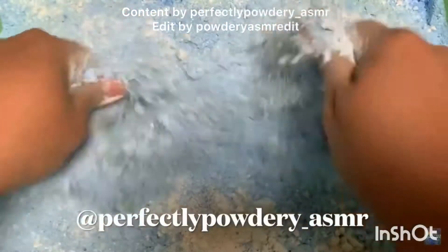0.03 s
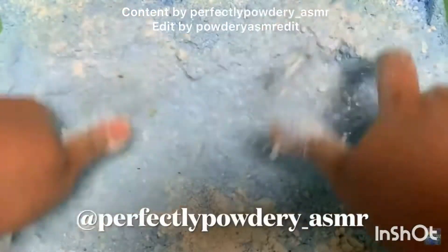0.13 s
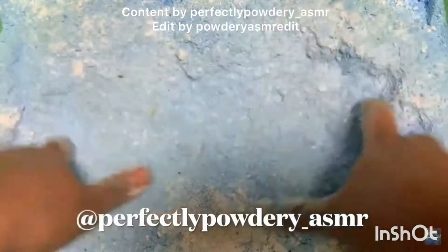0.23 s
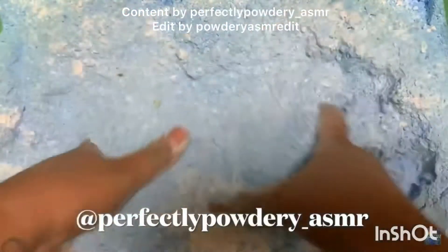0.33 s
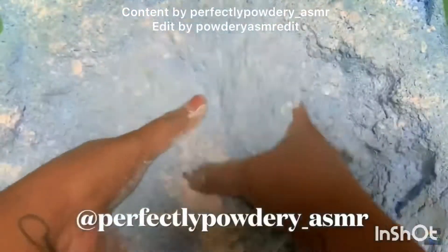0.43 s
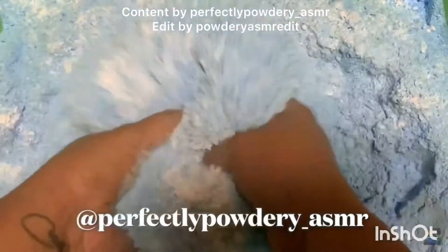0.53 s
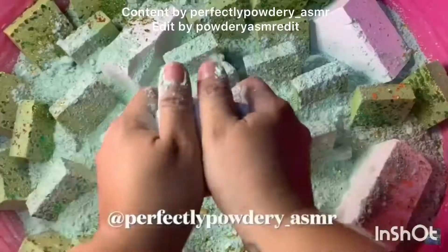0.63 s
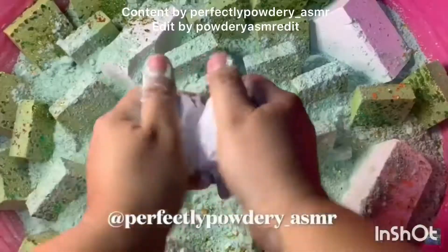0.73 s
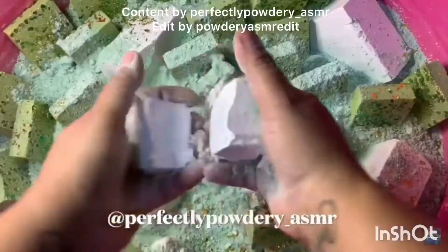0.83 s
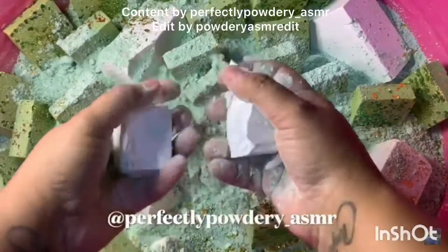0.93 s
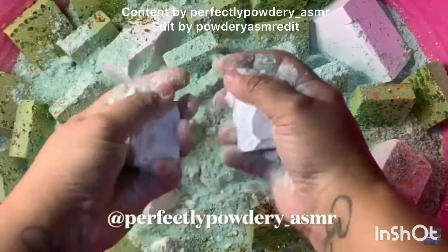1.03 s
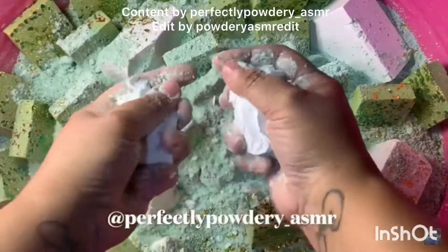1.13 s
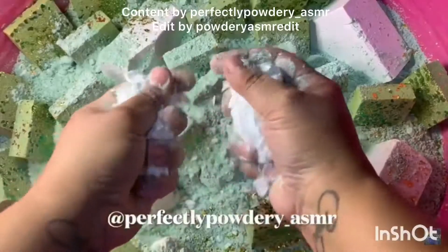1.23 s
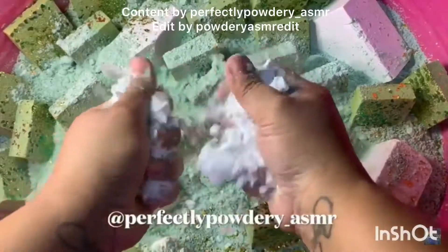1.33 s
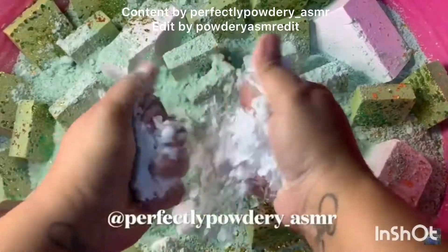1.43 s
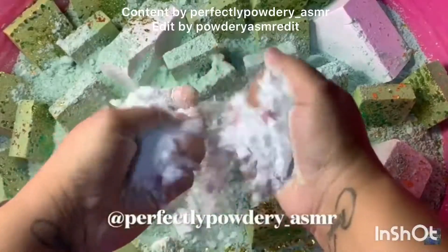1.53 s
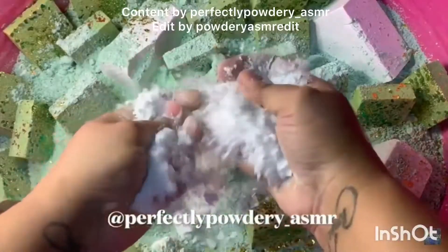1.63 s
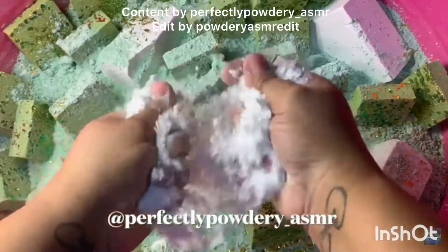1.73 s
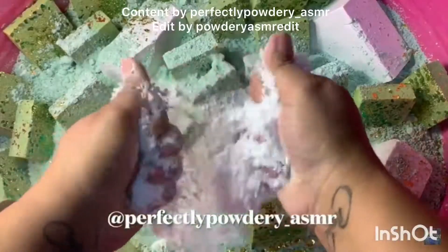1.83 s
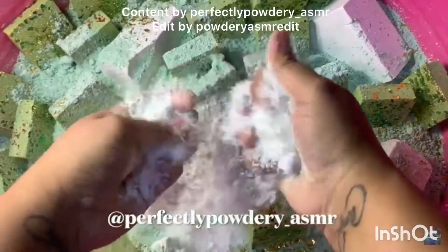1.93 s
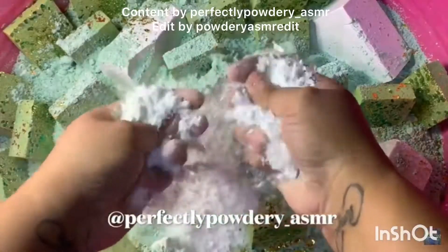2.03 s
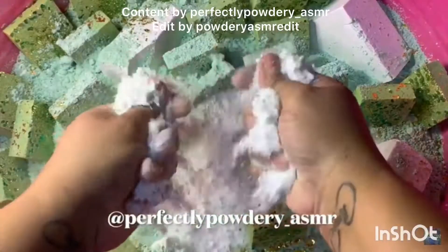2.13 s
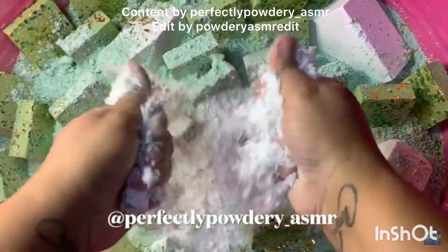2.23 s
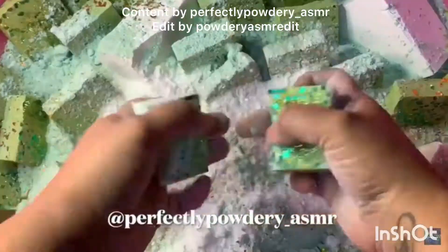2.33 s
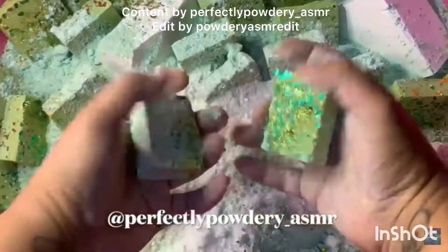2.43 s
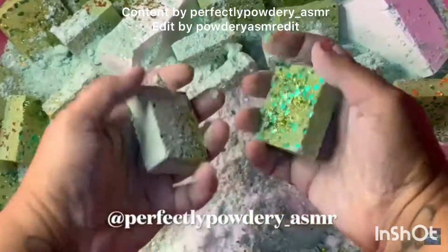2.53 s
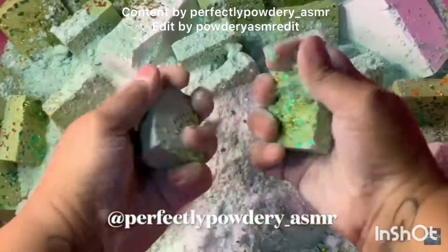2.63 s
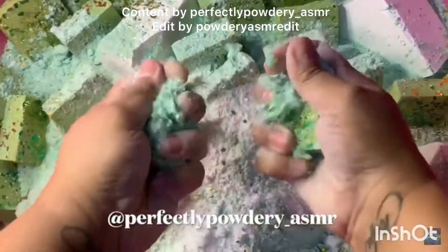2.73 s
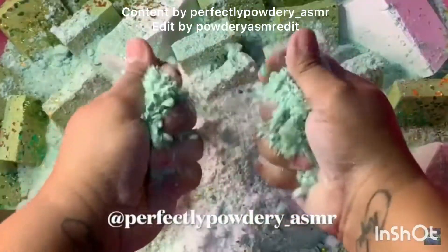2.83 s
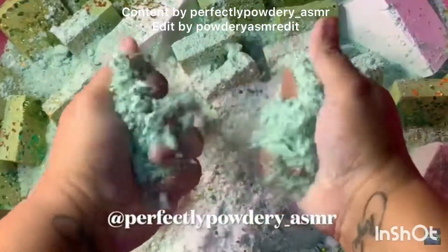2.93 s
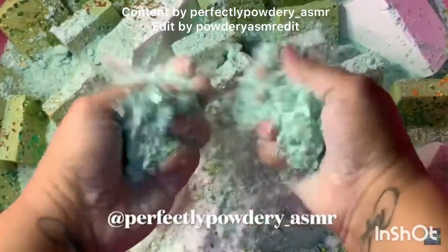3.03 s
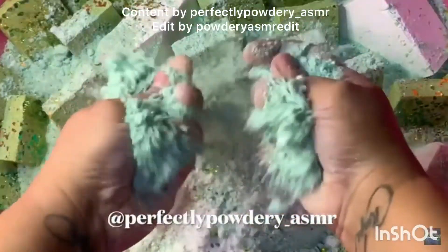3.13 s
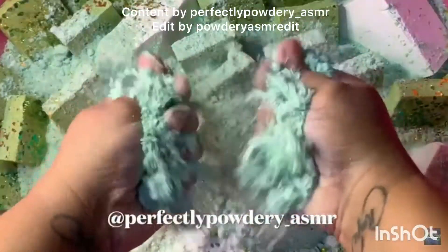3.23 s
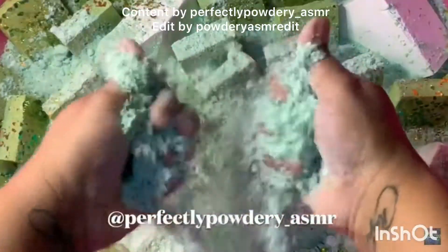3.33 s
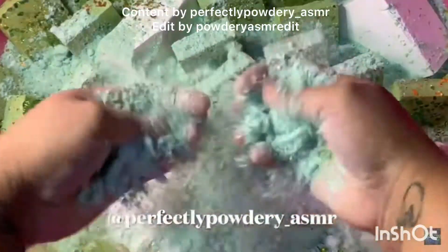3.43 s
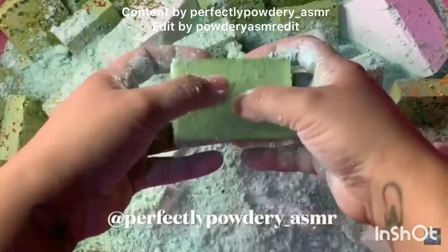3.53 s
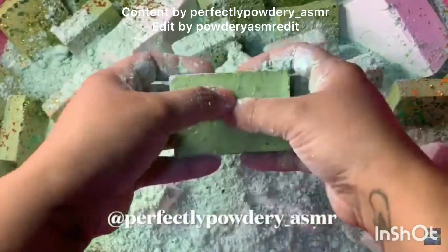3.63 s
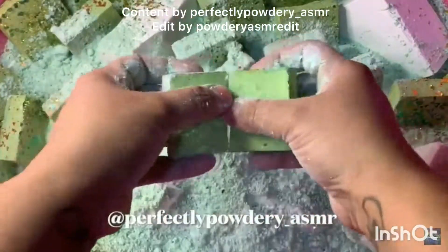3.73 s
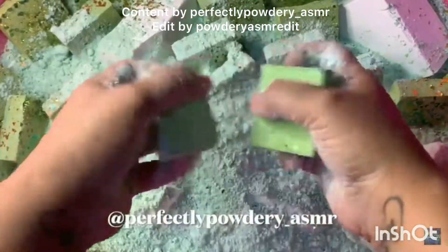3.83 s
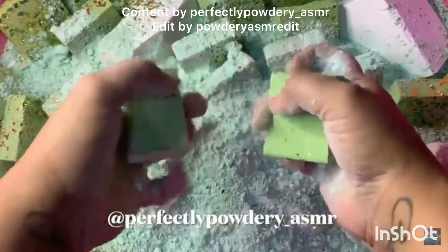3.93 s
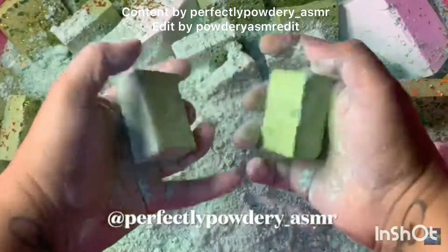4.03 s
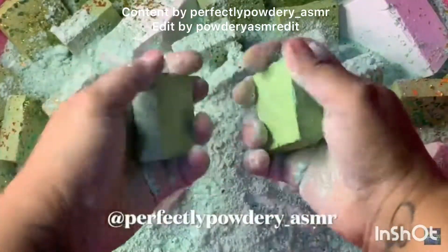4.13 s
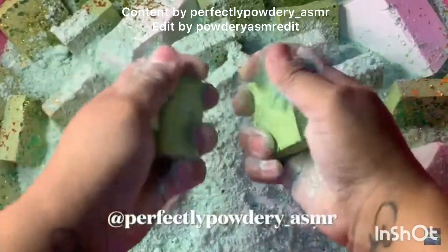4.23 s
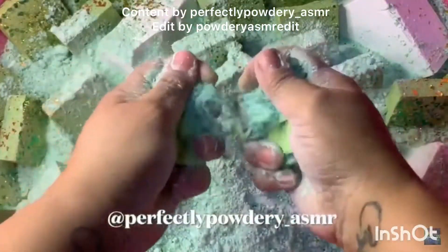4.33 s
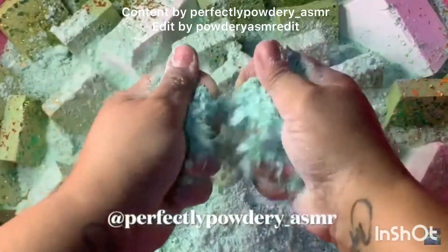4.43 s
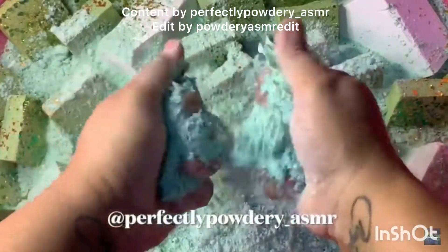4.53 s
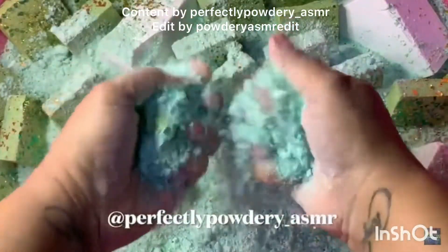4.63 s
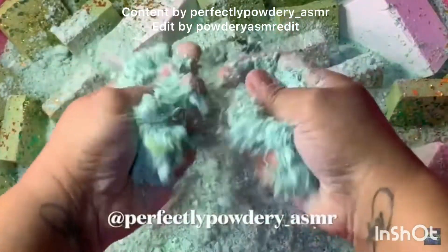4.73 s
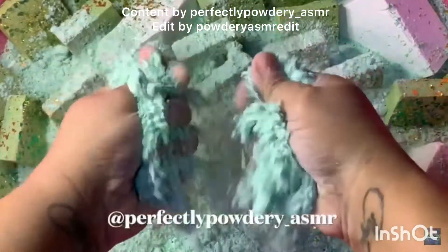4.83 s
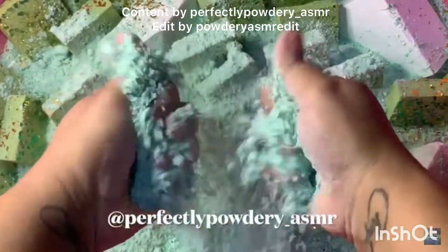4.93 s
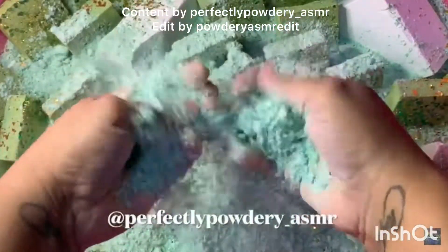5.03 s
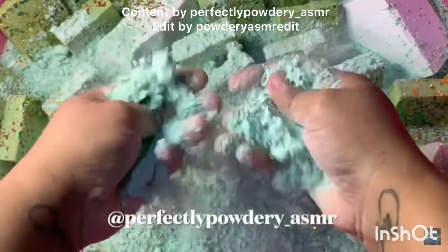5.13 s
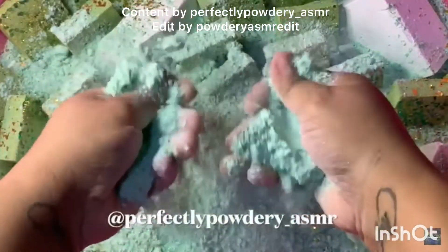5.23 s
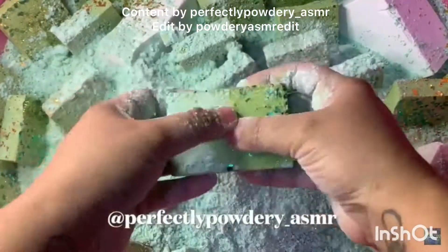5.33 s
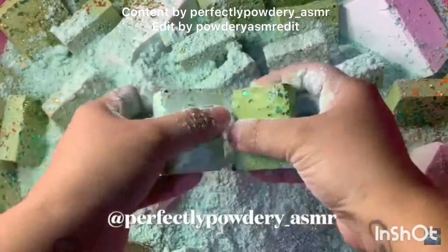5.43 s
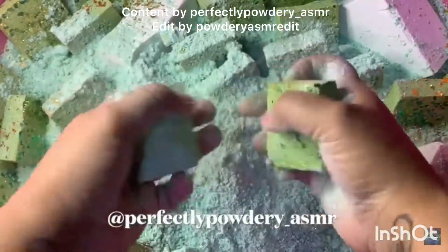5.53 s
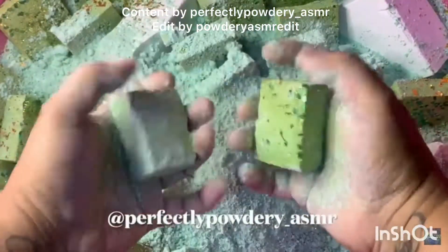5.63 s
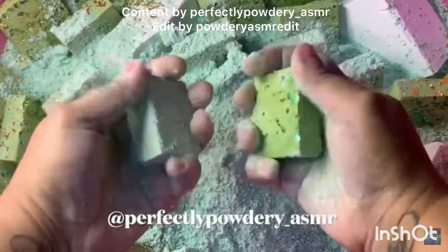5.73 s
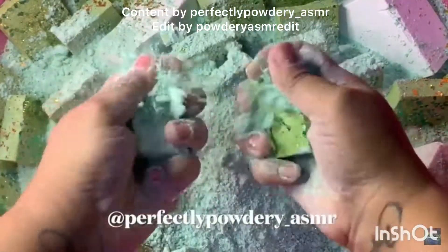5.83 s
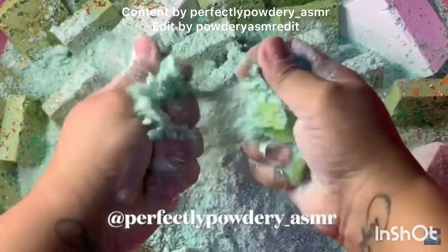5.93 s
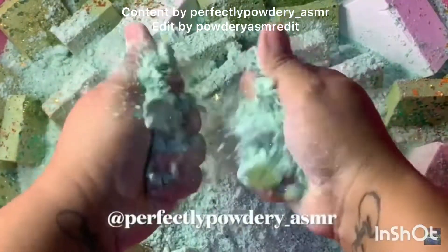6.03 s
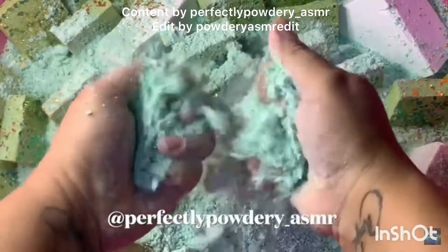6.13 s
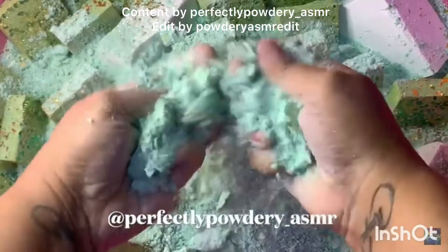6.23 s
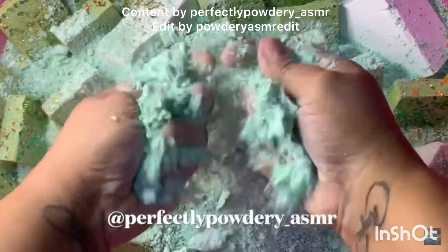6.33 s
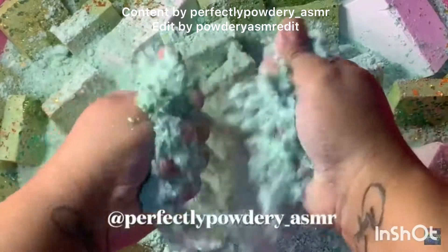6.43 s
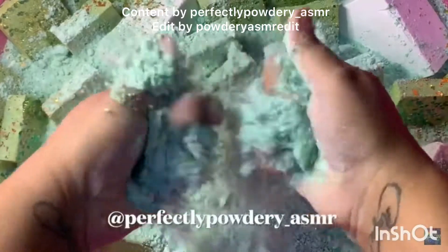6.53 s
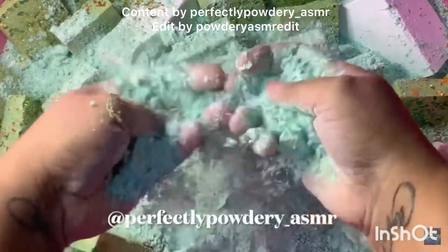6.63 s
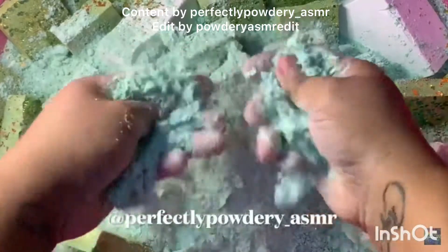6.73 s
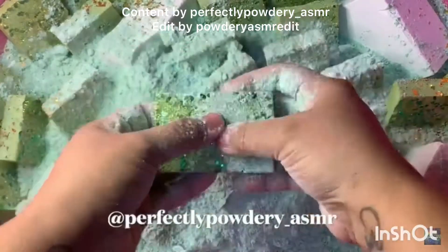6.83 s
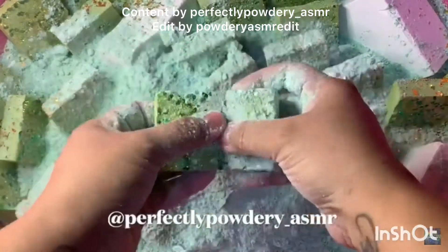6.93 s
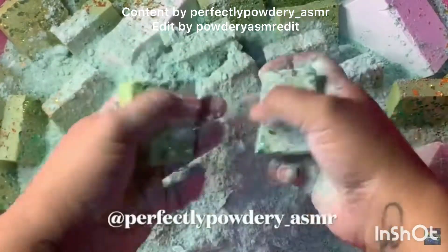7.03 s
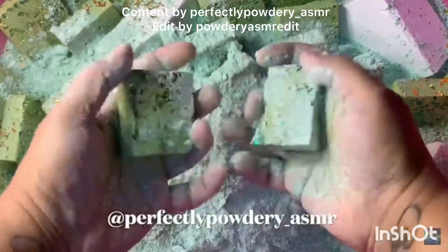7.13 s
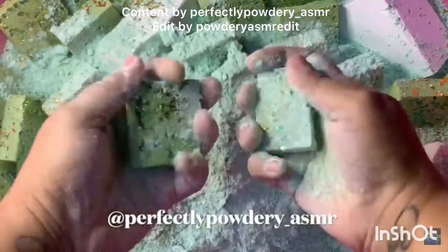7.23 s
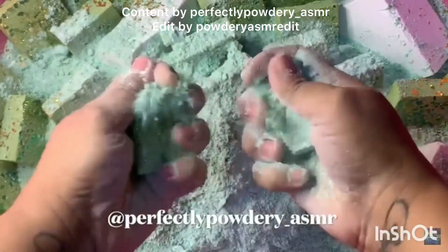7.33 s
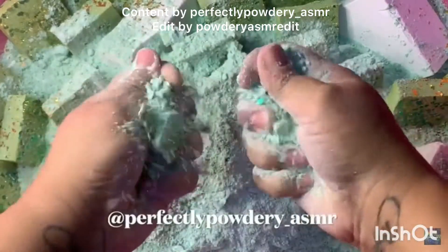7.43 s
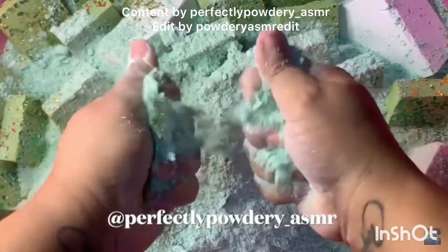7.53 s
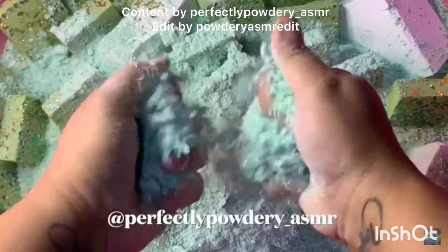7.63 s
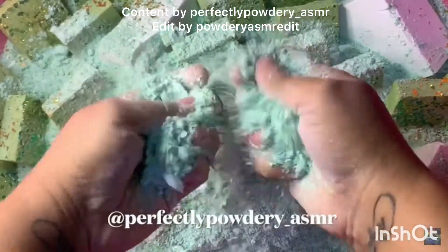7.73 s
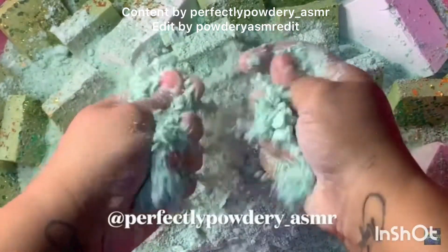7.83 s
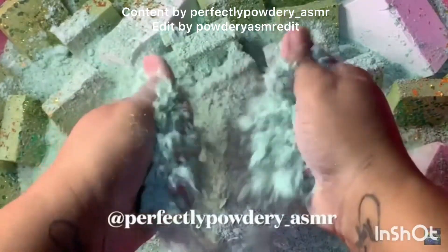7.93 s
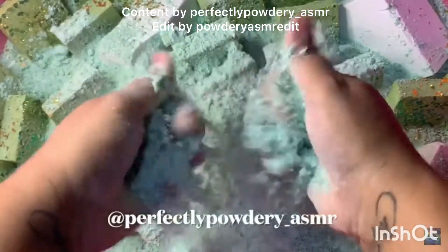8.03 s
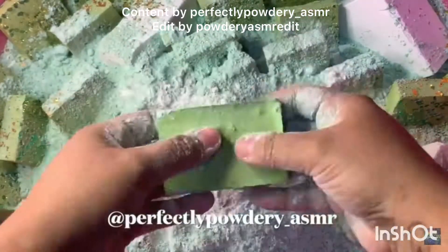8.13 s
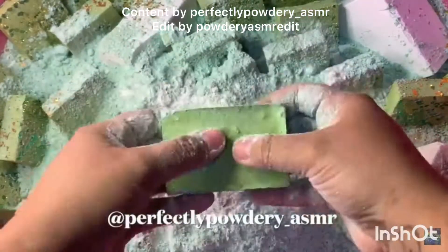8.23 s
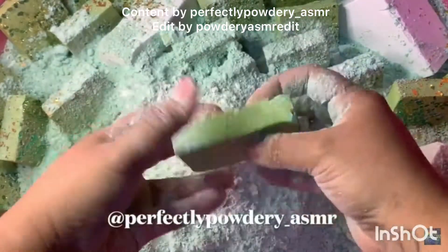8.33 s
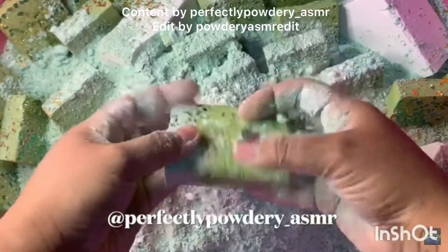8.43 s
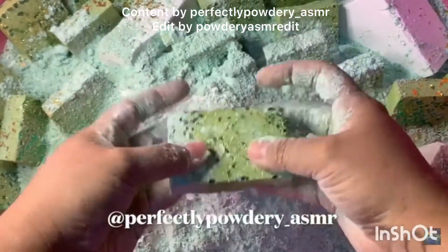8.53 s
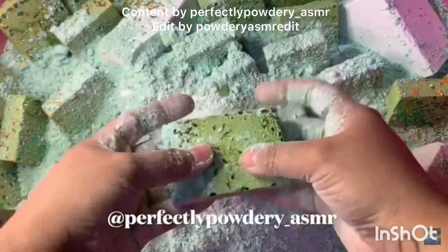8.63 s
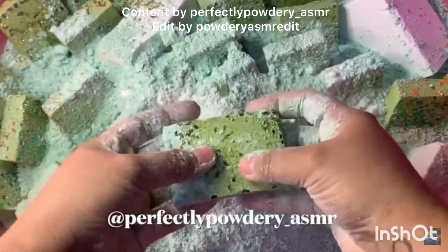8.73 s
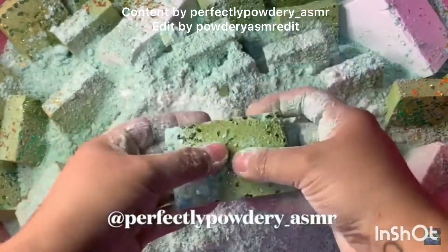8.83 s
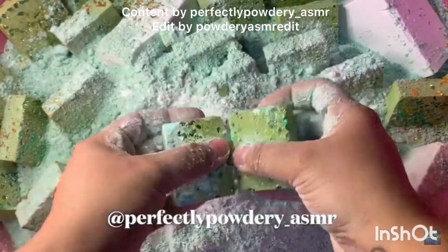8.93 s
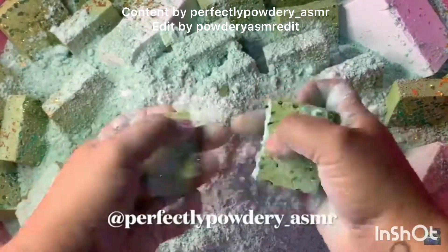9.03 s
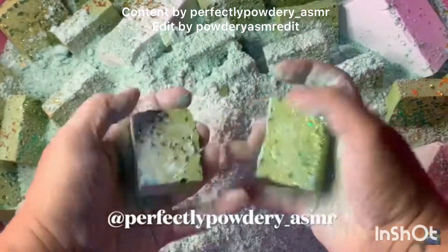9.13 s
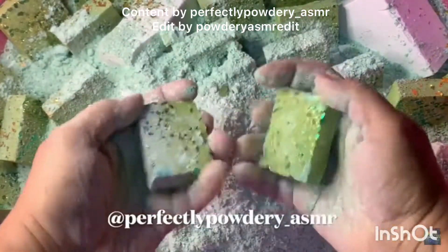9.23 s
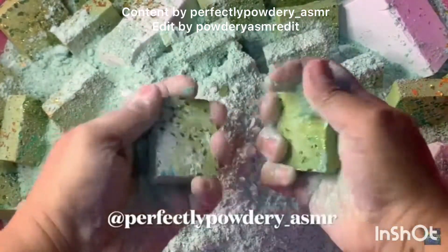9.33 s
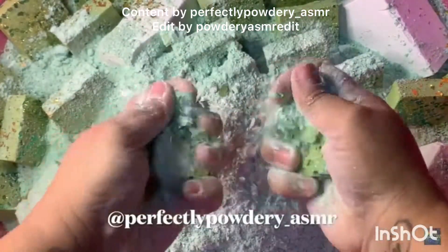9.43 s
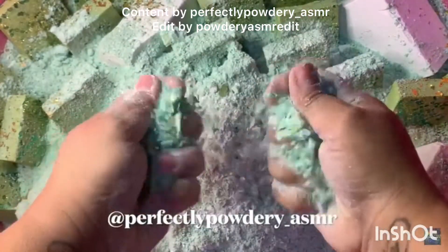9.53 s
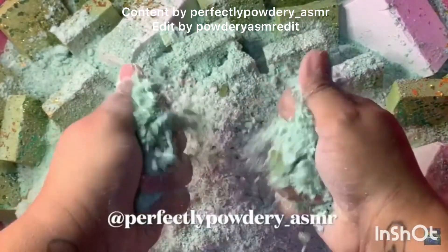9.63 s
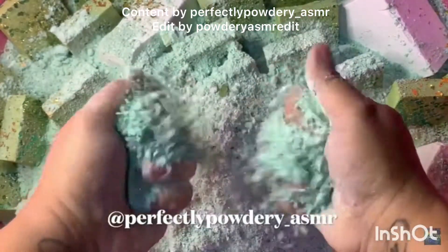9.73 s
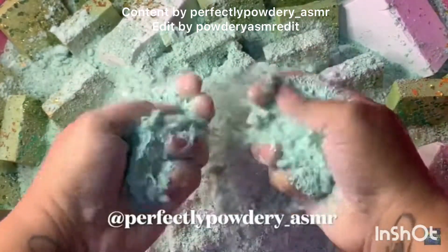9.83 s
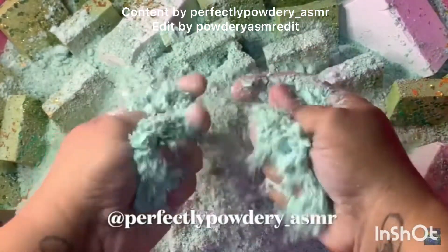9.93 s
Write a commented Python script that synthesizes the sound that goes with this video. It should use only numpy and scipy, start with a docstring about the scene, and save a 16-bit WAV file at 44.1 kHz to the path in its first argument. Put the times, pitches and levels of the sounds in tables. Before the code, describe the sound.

Close, dry sound over a faint low room rumble and hum. At 0 s powder crunches and wipes in the hands; at about 0.27 s they land in a heap with a deep soft thud and dull shifting roar. A cut near 0.55 s brings the loudest crack at 0.65 s, then cracks and crunching from 1.0 to 1.5 s, easing into crumbs and tumbling powder around 1.8 s. From 2.3 s fingers rub faintly ringing halves, crushed at 2.7 s. A new block is stroked from 3.45 s, snaps at 3.7 s and crumbles from 4.2 s. Another snaps sharply at 5.36 s and crunches from 5.8 to 6.5 s, with hissing wipes. After 6.8 s comes more rubbing, a strong crunch at 7.3 s and a palm wipe near 7.95 s. From 8.14 s strokes scrape a ringing block, which snaps at 8.9 s and is crushed from 9.4 s to the end.

```python
"""Soft chalk blocks snap in half and are crushed in two hands, close to a phone microphone.
Snaps are noise bursts that ring the halves, with a push into the palms; crumbs are grains over a pour of powder.
Powder hisses through the fingers, which rub faintly ringing blocks; at first the hands scoop in a heap.
A room rumbles and hums below. The scene is a string of short stretches; each after the first fades in briefly."""
import sys
import numpy as np
from scipy import signal
from scipy.fft import rfft, irfft, next_fast_len
from scipy.io import wavfile
from scipy.ndimage import uniform_filter1d, map_coordinates

SR = 44100
rng = np.random.default_rng(int(sys.argv[2]) if len(sys.argv) > 2 else 0)


def generate_wav(sig):
    """Save sig (samples, or channels by samples) to the path in sys.argv[1] as 16-bit PCM at SR."""
    pcm = np.round(np.clip(np.atleast_2d(sig).T, -1, 1) * 32767).astype(np.int16)
    wavfile.write(sys.argv[1], SR, pcm)


N = 440118


def amp(db):
    """Turn dB into gain."""
    return 10 ** (np.asarray(db) / 20)


def rms_one(x):
    """Scale to rms 1."""
    return x / np.sqrt(np.mean(x ** 2) + 1e-20)


def drift(rate_hz):
    """Slow random wander of about rms 1: noise through two equal low-pass poles, made at every 40th sample."""
    step = 40
    pole = np.exp(-2 * np.pi * rate_hz * step / SR)
    noise = rng.standard_normal(N // step + 2002)
    slow = signal.lfilter([1], [1, -2 * pole, pole * pole], noise)[2000:]   # settled part only
    return np.interp(np.arange(N) / step, np.arange(len(slow)), rms_one(slow))


def colour(x, points):
    """Give x the spectrum of the (hz, db) points, with a minimum-phase (causal) response."""
    size = next_fast_len(N + SR)
    short = 2 ** 16
    hz = np.maximum(np.arange(short // 2 + 1) * SR / short, 1)
    point_hz, point_db = np.transpose(points)
    log_gain = np.interp(np.log(hz), np.log(point_hz), point_db) * np.log(10) / 20
    # folding the cepstrum onto positive time makes the response causal
    cepstrum = irfft(log_gain, short)
    cepstrum[1:short // 2] *= 2
    cepstrum[short // 2 + 1:] = 0
    response = irfft(np.exp(rfft(cepstrum)), short)[:SR]
    return irfft(rfft(x, size) * rfft(response, size), size)[:N]


def resonate(x, modes, flicker_db=0):
    """Parallel resonances, signs alternating; each may swell and sink on its own."""
    out = 0
    for k, (hz, width_hz, db) in enumerate(modes):
        r = np.exp(-np.pi * width_hz / SR)
        poles = [1, -2 * r * np.cos(2 * np.pi * hz / SR), r * r]
        zeros = [(1 - r * r) / 2, 0, (r * r - 1) / 2]
        gain = amp(db + flicker_db * drift(13)) if flicker_db else amp(db)
        out = out + (-1) ** k * signal.lfilter(zeros, poles, gain * x + 1e-18)
    return out


def grains(per_s, spread_db, clump_db):
    """Random clicks of uneven size, their rate wandering so that they come in clumps."""
    sizes = amp(spread_db * np.minimum(rng.exponential(1, N), 5)) * rng.standard_normal(N)
    return sizes * (rng.random(N) < per_s * amp(clump_db * drift(25)) / SR)


def swells(rows):
    """Summed power of bell-shaped swells, each cut off at its reach on either side of the middle."""
    power = np.zeros(N)
    for middle_s, reach_s, db in rows:
        first = max(round((middle_s - reach_s) * SR), 0)
        last = min(round((middle_s + reach_s) * SR), N)
        at = np.arange(first, last)
        power[at] += amp(db) ** 2 * np.exp(-((at / SR - middle_s) / reach_s * 3) ** 2)
    return power


# cracks and snaps in the hands: start_s, crack_db [relative], thump_peak_db, brightness_db [bright over dull]
SNAPS = [(.096, -22, -37, -10), (.146, -24, -43, 2), (.267, -23, -28, -35), (.59, -33, -54, -16),
         (.611, -22, -54, -11), (.629, -20, -42, -1), (.646, -.5, -9.5, -7), (.683, -29, -31.5, 7),
         (.903, -33, -46, -13), (.953, -31, -37, -11), (.996, -31, -52, -20), (1.038, -20, -34, -19),
         (1.066, -10, -18.5, -24), (1.114, -13, -28, -23), (1.151, -15, -49, -29), (1.169, -16, -40, -30),
         (1.219, -20.5, -55, -24), (1.269, -20, -52, -9), (1.369, -26, -57, -5), (1.445, -14, -22.5, -40),
         (1.474, -32, -35, -25), (1.783, -36, -31, -20), (1.872, -37, -32, -18), (2.561, -24, -36, 19),
         (2.673, -22, -33, -2), (2.692, -19, -24, -20), (2.733, -15, -24, -35), (2.755, -18, -26, -26),
         (2.894, -25, -45, -10), (3.081, -23, -50, -26), (3.112, -22, -53, -20), (3.153, -24, -50, -8),
         (3.705, -26, -17, 8.5), (3.953, -29, -49, -2), (4.203, -17, -26.5, -10), (4.224, -27, -22.5, -14),
         (4.267, -17.5, -23, -26), (4.328, -19, -33, -11), (4.479, -22, -45, -10), (4.563, -22, -39, -29),
         (4.595, -22, -34, -27), (5.361, -12.5, -16, -2), (5.78, -21, -25.5, -23), (5.8, -11.5, -25.5, -32),
         (5.897, -18, -30, -23), (5.964, -25, -36, -15), (6.106, -25, -40, -16), (6.141, -24, -33, -14),
         (6.232, -20, -38, -34), (6.296, -22, -50, -19), (6.426, -16, -34, -33), (6.81, -40, -60, 5),
         (6.862, -30, -23.5, 6.5), (7.262, -18, -26.5, -24), (7.271, -24, -27.5, -6),
         (7.394, -22, -31, -38), (7.593, -18, -40, -38), (8.88, -19, -23, -10), (9.296, -33, -43, 11),
         (9.379, -16.5, -27.5, -20), (9.485, -21, -36, -37), (9.409, -27, -41, -22), (9.497, -33, -26, -24),
         (9.542, -21, -30, -22), (9.783, -20, -33, -35)]
# spectrum of a fracture: freq_hz, level_db [relative]
FRACTURE_SPECTRUM = [(500, -24), (1200, -1.5), (2300, -10), (3400, -1.5), (4900, -3.5), (7500, -8),
                     (11000, -11.5), (15000, -21)]
# modes of the broken halves, also rung by rubbing: freq_hz, width_hz, level_db [relative]
HALF_MODES = [(3140, 67, -12), (4120, 320, -17), (5630, 153, 4.5), (6730, 290, -4), (7850, 460, -10),
              (8660, 420, -4.5), (11740, 210, -10.5), (14600, 2900, -2.5)]
# block against cupped palms: freq_hz, width_hz, level_db [relative]
PALM_MODES = [(236, 590, 4), (481, 727, -1.5), (312, 12, 0), (446, 11, 0)]
CRACK_S = .0045   # length of a fracture, by which its main burst falls to e^-3


def cracks():
    """Each fracture is a burst of noise with a dusty tail that rings the pieces, and a soft push into the palm."""
    out, pushes = np.zeros(N), np.zeros(N)
    span = round(.1 * SR)
    t = np.arange(span) / SR
    noise = rng.standard_normal((len(SNAPS), span))
    dusty_tail = amp(-27) * np.exp(-t / 0.023)
    shape = (1 - np.exp(-t / 0.00031)) * (np.exp(-t * 3 / CRACK_S) + dusty_tail)
    for (start_s, crack_db, thump_peak_db, brightness_db), n in zip(SNAPS, noise):
        i = round(start_s * SR)
        dull = signal.lfilter([.5], [1, -.5], n)
        burst = amp(crack_db) * shape * (dull + amp(brightness_db) * (n - dull))
        out[i:i + span] += burst[:N - i]
        pushes[i + round(.0007 * SR)] = amp(thump_peak_db)
    pole = np.exp(-2 * np.pi * 900 / SR)
    # flesh softens the push
    soft = signal.lfilter([1], [1, -2 * pole, pole * pole], signal.unit_impulse(span))
    thump = np.array(resonate(soft, PALM_MODES))
    thumps = signal.oaconvolve(pushes, thump / np.abs(thump).max())[:N]
    return colour(out, FRACTURE_SPECTRUM) + amp(-10.5) * resonate(out, HALF_MODES) + thumps


# one row a stretch: start_s, close_s [hands close on the chalk], crumbling_db, hiss_db [powder, as they close]
HANDFULS = [(0, -.2, -54, -55), (.555, .92, -50, -50), (2.325, 2.56, -49, -51), (3.452, 4.16, -48.5, -54),
            (5.272, 5.7, -50, -53), (6.784, 7.12, -51, -57), (8.138, 9.18, -51, -56)]
HOLDING_DB, CLOSING_S = -67, .25   # crumbling level before the hands close; time they take to close
EASING_DB_PER_S, HISS_FADE_DB_PER_S = 2.2, 13   # the powder hiss thins faster than the crumbling


def squeezing():
    """Closing hands raise crumbling (dB) and powder hiss (gain), which then ease off with time."""
    start_s, close_s, crumbling_db, hiss_db = np.transpose(HANDFULS)
    t = np.arange(N) / SR
    row = np.searchsorted(start_s, t, "right") - 1
    since = t - close_s[row]
    closed = np.clip(since / CLOSING_S, 0, 1)
    squeezed_db = crumbling_db[row] - EASING_DB_PER_S * since
    level_db = HOLDING_DB + closed * (squeezed_db - HOLDING_DB)
    hiss = amp(hiss_db[row] - HISS_FADE_DB_PER_S * since) * closed ** 2
    return level_db, hiss


# crunches, a lump giving way in a swarm of grains: middle_s, reach_s [either side], level_db
CRUNCHES = [(0.06, 0.11, -45), (1.119, 0.032, -40.5), (1.163, 0.041, -44), (1.8, 0.065, -46),
            (1.885, 0.052, -50), (2.672, 0.016, -44), (2.729, 0.098, -42.5), (2.763, 0.024, -44.5),
            (4.223, 0.033, -42), (4.273, 0.04, -42), (4.352, 0.12, -45.5), (4.9, 0.2, -47),
            (5.807, 0.077, -44.5), (5.905, 0.12, -43.5), (6.461, 0.064, -42.5), (7.269, 0.02, -40),
            (7.311, 0.032, -33.5), (8.408, 0.02, -45), (8.447, 0.02, -46), (9.381, 0.043, -41.5),
            (9.501, 0.033, -42)]
# spectrum of crumbs and pouring powder: freq_hz, level_db [relative]
CRUMBLE_SPECTRUM = [(150, -5), (400, 2.5), (800, -2), (2100, -4), (3800, -5), (7000, -10.5), (11000, -13.5),
                    (15000, -36)]


def crumbling(level_db):
    """Crumbs break as short puffs, each ringing a few cycles at a pitch dealt by chance, over a pour of powder."""
    power = amp(level_db + 1.06 * drift(15)) ** 2 + swells(CRUNCHES)
    powder = rms_one(grains(per_s=9000, spread_db=-1.5, clump_db=1.0))
    coarse = signal.lfilter([.25], [1, -.75], powder)
    fine = powder - coarse
    # coarse and fine powder fall in surges of their own
    pour = coarse * amp(2.9 * drift(6.8)) + fine * amp(1.87 * drift(11))
    breaks = grains(per_s=350, spread_db=1.0, clump_db=3.5)
    decay = np.exp(-1 / (.0022 * SR))   # a puff dies in about 2 ms
    pitches_hz = np.geomspace(350, 7000, 8)
    dealt = rng.integers(0, 8, N)
    noise = rng.standard_normal(N)
    crumbs = 0
    for k, pitch_hz in enumerate(pitches_hz):
        envelope = signal.lfilter([1], [1, -decay], np.abs(breaks) * (dealt == k) + 1e-18)
        puffs = noise * envelope
        crumbs = crumbs + 0.5 * puffs + resonate(puffs, [(pitch_hz, pitch_hz * 0.32, 6.0)])
    mixed = pour + amp(-4.5) * rms_one(crumbs)
    return np.sqrt(power) * rms_one(colour(mixed, CRUMBLE_SPECTRUM))


# palms wiping past each other, a swell of hiss: middle_s, reach_s [either side], level_db
WIPES = [(.085, 0.07, -44), (1.55, .08, -66), (1.9, 0.13, -63), (2.29, 0.34, -55), (3.35, 0.13, -60),
         (4.42, .1, -62), (4.92, .15, -56), (5.25, 0.12, -51), (6.14, 0.092, -53), (6.48, 0.096, -51),
         (7.66, 0.08, -53), (7.95, 0.17, -48)]
# spectrum of powder on skin: freq_hz, level_db [relative]
SKIN_SPECTRUM = [(2000, -41), (4000, 0), (6000, 2), (8500, -0.5), (10500, -8), (13500, 2.5), (15500, 0)]
STILL_DB = -65.5   # faint hiss while the hands only hold


def sliding(hiss):
    """Powder slides between the fingers as a thin bright hiss of dense grains with a wandering level."""
    level = np.sqrt((amp(STILL_DB) + hiss) ** 2 + swells(WIPES))
    surges = amp(3.3 * drift(14))
    powder = rms_one(colour(grains(per_s=25000, spread_db=1.5, clump_db=1.5), SKIN_SPECTRUM))
    return level * surges * powder


# finger strokes on solid chalk: start_s, end_s, first_db, last_db [drive into the chalk]
STROKES = [(.69, .745, -56, -64), (.75, .86, -58, -64), (.89, 1.033, -58, -56), (2.327, 2.411, -50, -50),
           (2.44, 2.5, -62, -54), (2.534, 2.556, -43, -43), (2.578, 2.662, -49, -52),
           (3.48, 3.605, -55, -52), (3.71, 3.8, -51, -56), (3.807, 3.993, -46, -45),
           (4.011, 4.05, -45, -54), (4.055, 4.14, -49, -45), (4.14, 4.198, -50, -53),
           (5.288, 5.315, -64, -62), (5.456, 5.52, -52, -49), (5.531, 5.675, -43, -58),
           (5.683, 5.78, -43, -55), (6.93, 7.0, -63, -49), (7.0, 7.05, -50, -54), (7.056, 7.12, -41, -62),
           (7.144, 7.208, -46, -46), (7.22, 7.249, -54, -57), (8.141, 8.18, -54, -51),
           (8.237, 8.32, -55, -68), (8.337, 8.42, -51, -52), (8.429, 8.5, -41, -48),
           (8.505, 8.601, -52, -47), (8.628, 8.699, -60, -58), (8.744, 8.857, -63, -61),
           (8.94, 9.035, -66, -52), (9.04, 9.126, -50, -57), (9.168, 9.245, -47, -45),
           (9.247, 9.36, -51, -52)]
# times when the block is still whole: start_s, end_s
UNBROKEN = [(3.452, 3.705), (5.272, 5.361), (8.138, 8.88)]
# modes of the whole block: freq_hz, width_hz, level_db [relative]
WHOLE_MODES = [(3310, 330, -8.5), (3880, 57, 4.5), (5000, 200, -20), (5880, 84, 8.5), (6550, 370, -16),
               (7530, 170, -13), (8420, 130, -12), (10500, 180, -12.5), (12000, 190, -9.5),
               (14500, 2800, -4)]
RESTING_DB = -78.5   # drive of fingers creeping on the whole block between strokes
WAVER_S = .0004      # the halves shift in the grip: rms delay that wavers their ring in pitch


def rubbing():
    """Skin drags over the grain of solid chalk; the shifting grip favours now one mode, now another."""
    t, touch, whole = np.arange(N) / SR, np.full(N, 1e-9), np.zeros(N, bool)
    for start_s, end_s, first_db, last_db in STROKES:
        at = slice(round(start_s * SR), round(end_s * SR))
        touch[at] = amp(np.interp(t[at], [start_s, end_s], [first_db, last_db]))
    for start_s, end_s in UNBROKEN:
        whole |= (t >= start_s) & (t < end_s)
    touch = np.maximum(touch, amp(RESTING_DB) * whole)
    touch = uniform_filter1d(touch, size=450)   # strokes start and stop over about 10 ms
    drive = touch * rms_one(grains(per_s=8000, spread_db=3.0, clump_db=2.0))
    whole_ring = amp(12.5) * resonate(drive * whole, WHOLE_MODES, flicker_db=3.0)
    half_ring = amp(12.0) * resonate(drive * ~whole, HALF_MODES, flicker_db=2.5)
    scrape = amp(-0.5) * np.diff(drive, prepend=0)
    rub = whole_ring + half_ring + scrape
    wavering_s = t + WAVER_S * drift(7) * ~whole
    return map_coordinates(rub, [wavering_s * SR], order=3)


# scooping the heap, up to the last row: time_s, level_db [low rumble]
SCOOP = [(0.0, -40.5), (0.244, -39.5), (0.278, -26), (0.368, -34), (0.538, -32.5), (0.555, -33.5)]
# both hands land in the heap, a single row: start_s, freq_hz, width_hz, level_db [relative]
LANDING = (.268, 72, 18, 16.5)
# loose powder tumbling onto the heap: middle_s, reach_s [either side], level_db
TUMBLES = [(1.81, .07, -42), (1.91, .1, -42)]
# spectrum of the heap: freq_hz, level_db [relative]
HEAP_SPECTRUM = [(12, -38), (20, 4.5), (188, -14.5), (239, -8.5), (501, -22), (539, -17), (622, -23.5),
                 (1540, -23.5), (6000, -55), (7800, -90), (13200, -120)]


def scooping():
    """The hands land in the heap with a resonant thud; it shifts under them with a dull roar of clumped grains."""
    t = np.arange(N) / SR
    time_s, rumble_db = np.transpose(SCOOP)
    level_db = np.interp(t, time_s, rumble_db)
    lumps = rms_one(colour(grains(per_s=3700, spread_db=-0.5, clump_db=4.0), HEAP_SPECTRUM))
    start_s, hz, width_hz, db = LANDING
    blow = signal.unit_impulse(N, round(start_s * SR))
    softened = resonate(blow, [(hz, width_hz * 6, 20)])
    thud = resonate(softened, [(hz, width_hz, db)])
    scoop = (amp(level_db) * lumps + thud) * (t < time_s[-1])
    return scoop + np.sqrt(swells(TUMBLES)) * lumps


# spectrum of the room rumble: freq_hz, level_db [relative]
ROOM_SPECTRUM = [(8.2, -18.5), (14, 6.5), (33, -4.5), (54, -16.5), (162, -27.5), (185, -39), (441, -26.5),
                 (584, -43.5), (758, -34.5), (2500, -84.5), (3250, -97), (5500, -120)]
# wavering hum: freq_hz, width_hz, level_db
HUM = [(77, 11, -51), (156, 11, -59), (236, 16, -65), (272, 16, -63)]
ROOM_DB = -43.5


def room():
    """Low rumble of coloured noise and a rough hum: noise through a few wide resonances."""
    level = amp(ROOM_DB + 0.5 * drift(0.83))
    rumble = level * rms_one(colour(rng.standard_normal(N), ROOM_SPECTRUM))
    hum = 0
    for hz, width_hz, db in HUM:
        line = resonate(rng.standard_normal(N), [(hz, width_hz, 0)])
        hum = hum + amp(db) * rms_one(line)
    return rumble + hum


FADE_IN_S = 0.029


def scene():
    """Sum all sources, faded in at the start of every stretch after the first."""
    crumble_db, hiss = squeezing()
    mix = crumbling(crumble_db) + sliding(hiss) + rubbing() + cracks() + scooping() + room()
    t, fade = np.arange(N) / SR, np.ones(N)
    for start_s, *_ in HANDFULS[1:]:
        later = t >= start_s
        fade[later] = np.clip(0.052 + (t[later] - start_s) / FADE_IN_S, 0, 1)
    return (mix * fade)[None]


CUTOFF_HZ = 15750


def record(dry):
    """The top is cut steeply by an elliptic low-pass."""
    low_pass = signal.ellip(10, .5, 55, CUTOFF_HZ, fs=SR, output="sos")   # ripple dB, stop-band dB
    return signal.sosfilt(low_pass, dry)


dry = scene()
out = record(dry)
generate_wav(out)
```